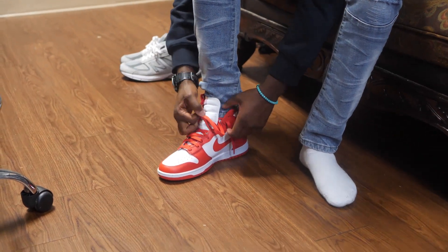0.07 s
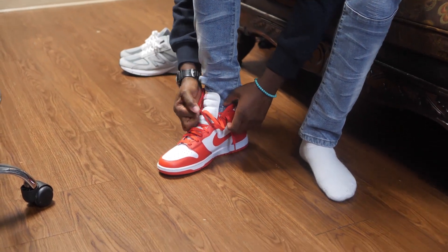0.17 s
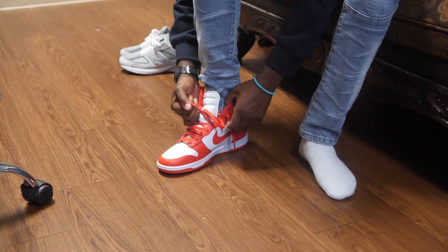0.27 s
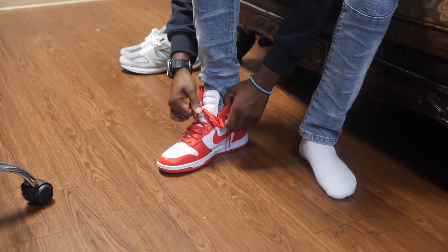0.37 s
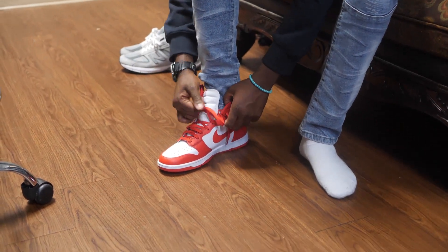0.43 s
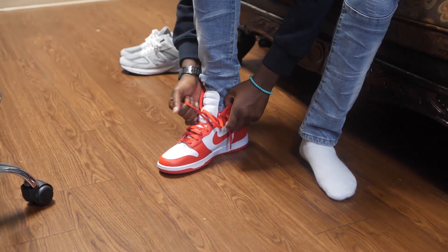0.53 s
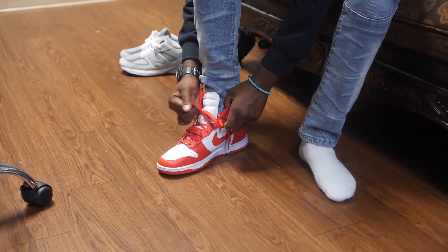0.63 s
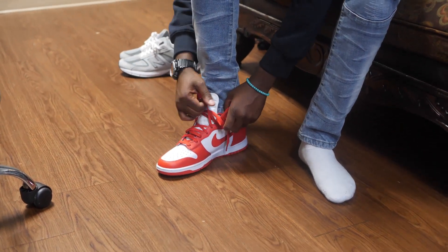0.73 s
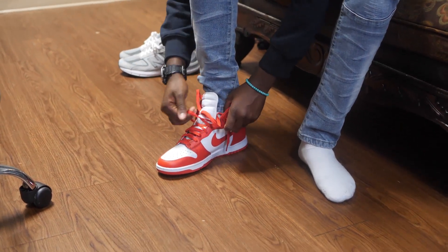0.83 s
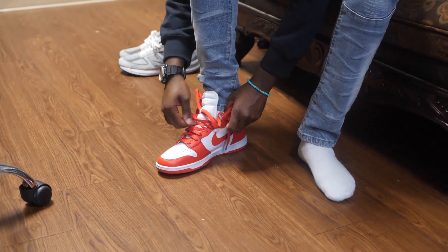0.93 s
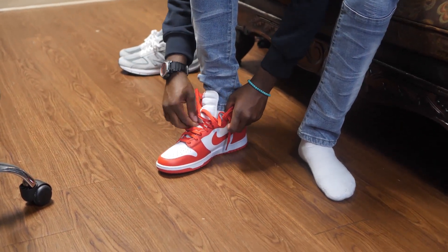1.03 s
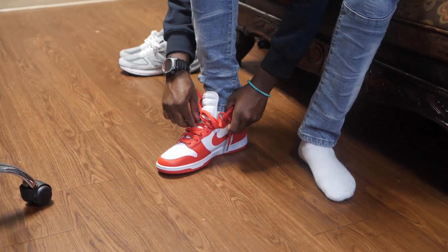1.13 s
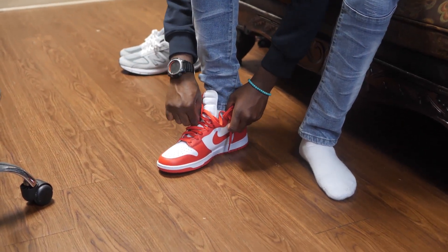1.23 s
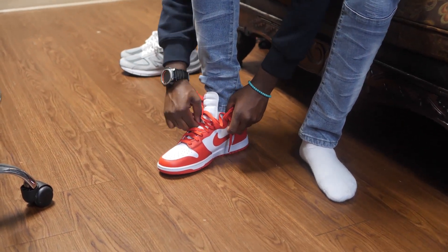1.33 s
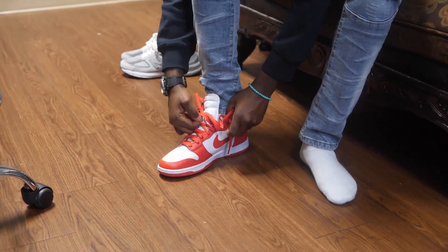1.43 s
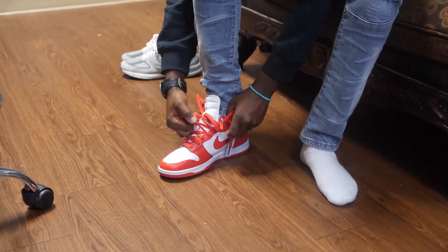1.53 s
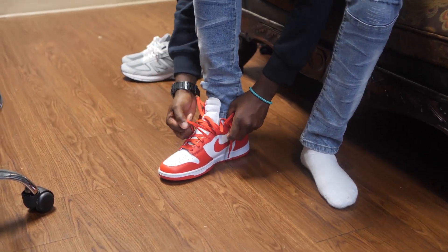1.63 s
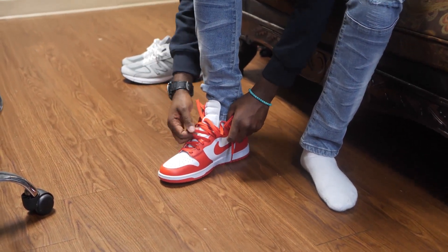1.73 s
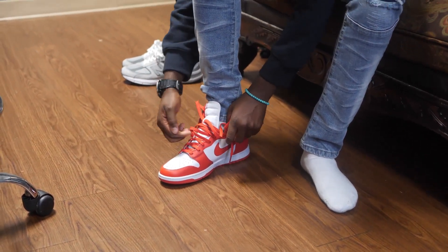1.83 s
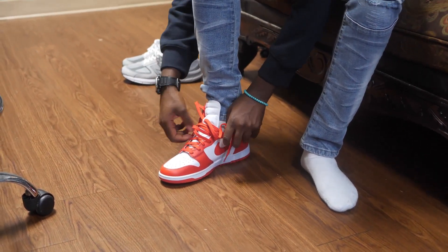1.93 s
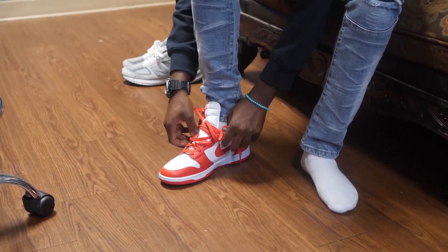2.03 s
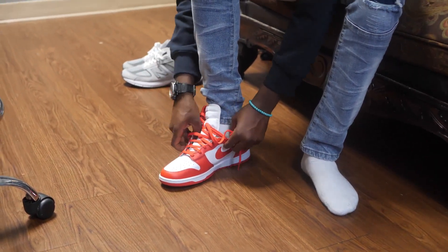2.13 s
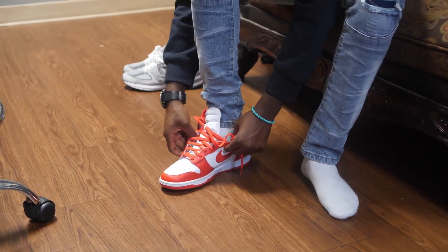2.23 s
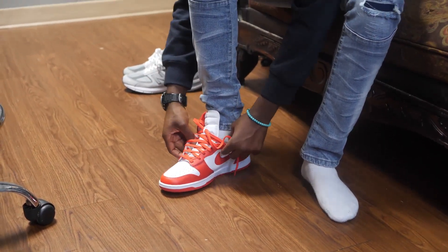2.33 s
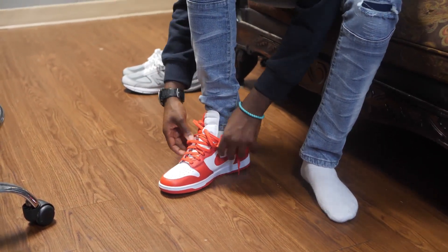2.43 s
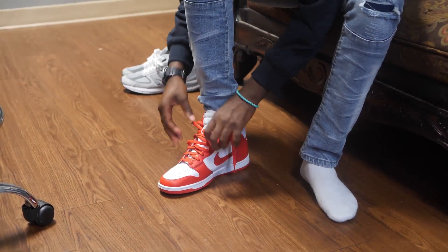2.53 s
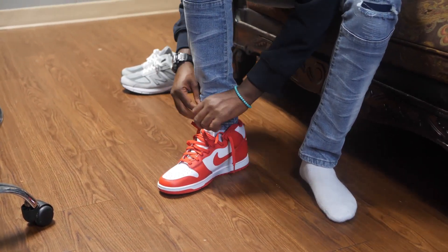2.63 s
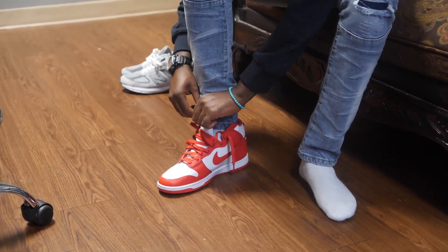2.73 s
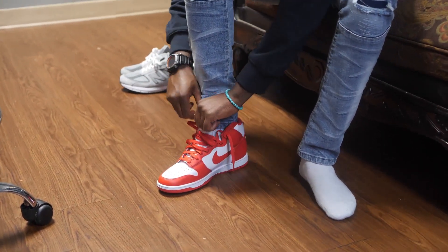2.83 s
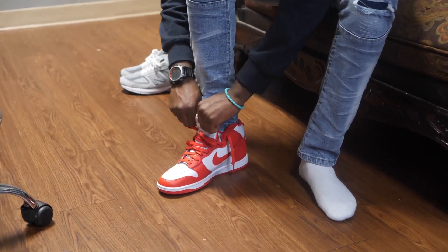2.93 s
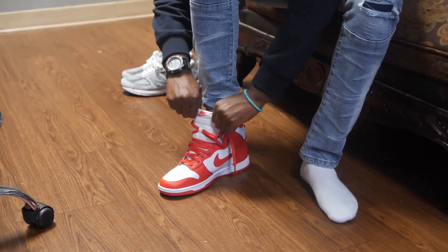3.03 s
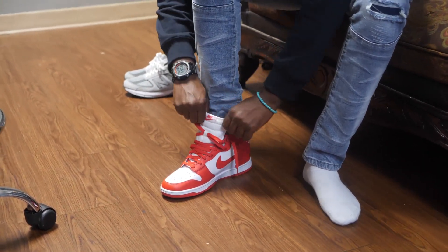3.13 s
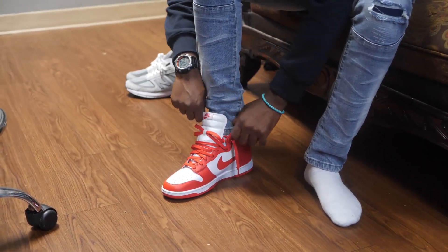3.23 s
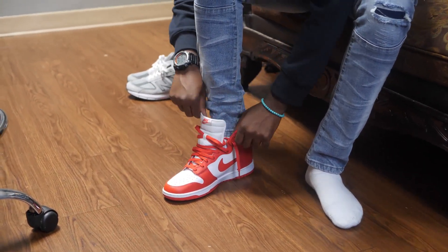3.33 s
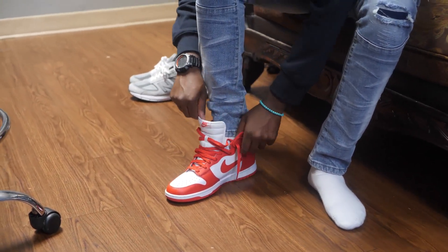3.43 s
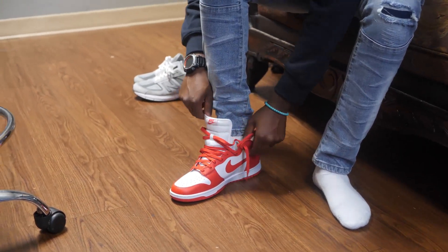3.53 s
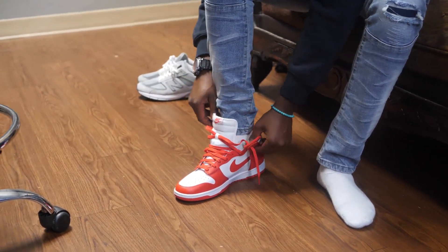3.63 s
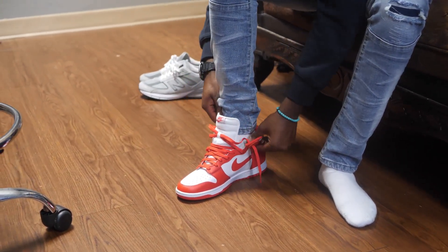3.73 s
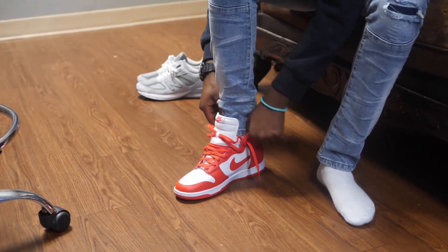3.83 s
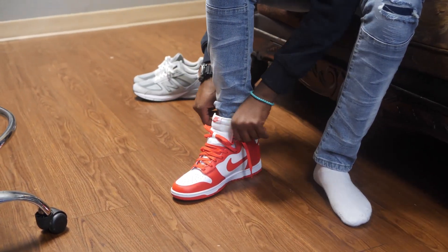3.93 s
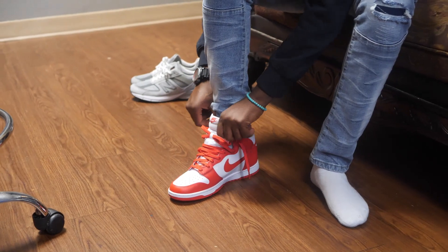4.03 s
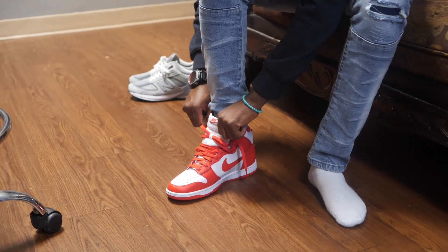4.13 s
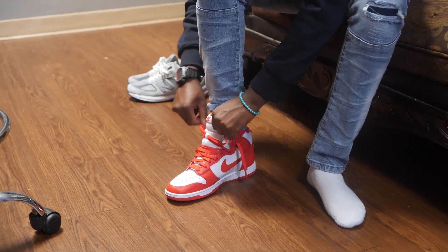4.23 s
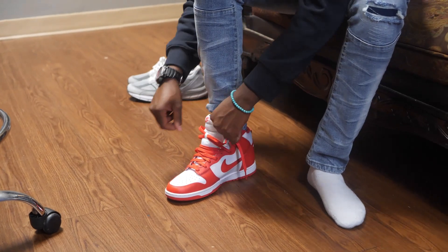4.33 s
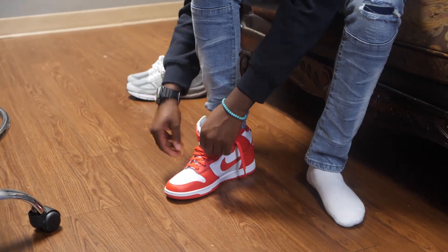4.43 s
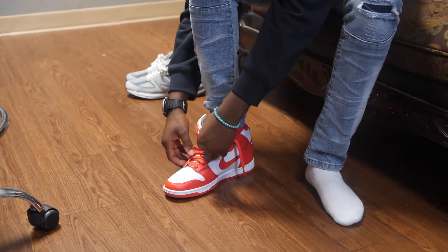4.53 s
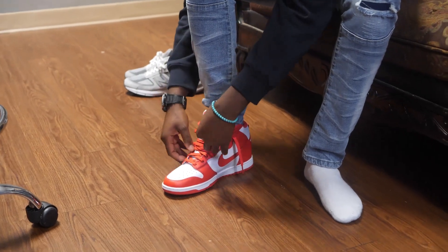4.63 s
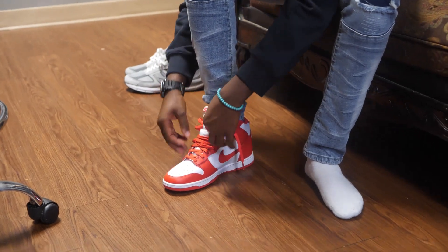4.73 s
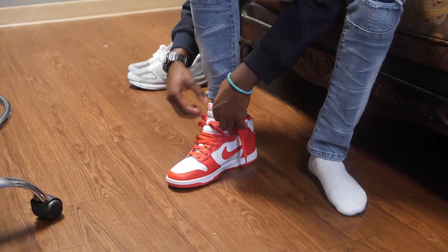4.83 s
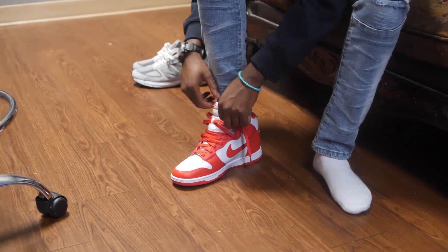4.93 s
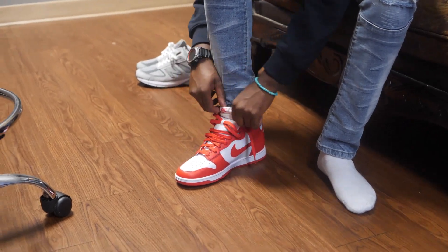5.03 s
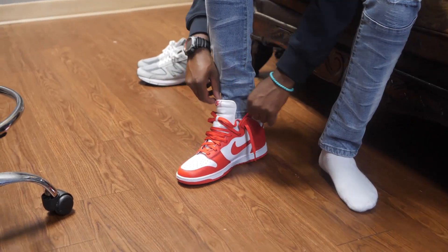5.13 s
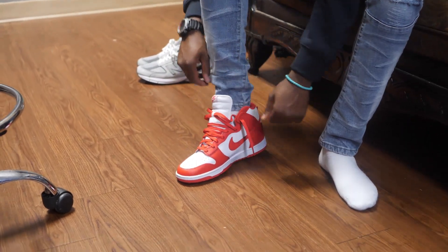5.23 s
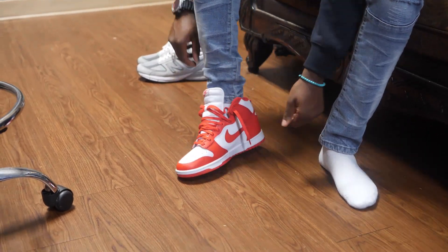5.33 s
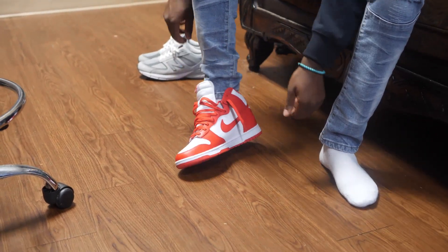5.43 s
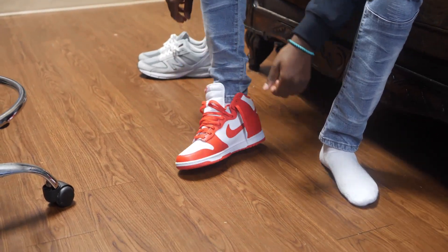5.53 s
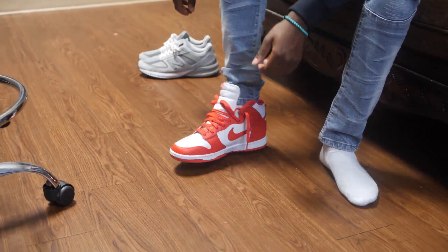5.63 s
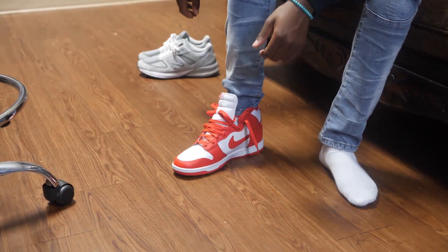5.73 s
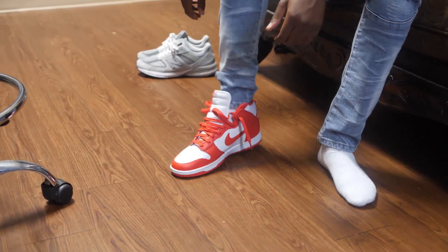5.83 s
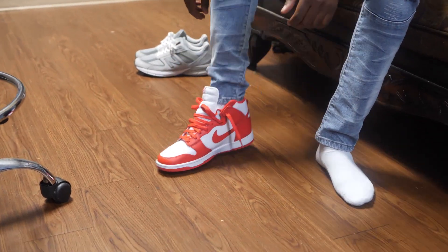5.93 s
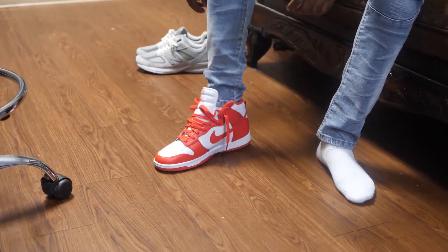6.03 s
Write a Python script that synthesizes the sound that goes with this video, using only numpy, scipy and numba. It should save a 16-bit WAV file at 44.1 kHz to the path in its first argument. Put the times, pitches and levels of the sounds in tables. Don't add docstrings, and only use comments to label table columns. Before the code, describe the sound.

In a small, quiet indoor room, close microphones catch laces sliding and tightening, leather creasing hollowly and denim and sleeves brushing. Light knocks and tiny clicks dot the rustling, which pauses and restarts with each hand movement. After a softer stretch, two abrupt, crunchy sole knocks hit the wooden floor, answered by a short room reflection over soft steady air noise.

```python
import sys
import numpy as np
from scipy import signal
from scipy.fft import rfft, irfft
from scipy.io import wavfile
from scipy.ndimage import uniform_filter1d
from numba import njit

SR = 44100
rng = np.random.default_rng(int(sys.argv[2]) if len(sys.argv) > 2 else 0)


def transcribe(signal):
    frames = np.atleast_2d(signal).T
    limited = np.clip(frames, -1, 1)
    pcm = np.round(limited * 32767).astype(np.int16)
    wavfile.write(sys.argv[1], SR, pcm)


def convert_level_to_amplitude(level_db):
    exponent = np.asarray(level_db, float) / 20
    return 10 ** exponent


N = 268128

# pitch_hz, side_minus_mid_db
WIDTH = [(60, -45), (110, -69), (200, -40), (380, -18), (700, -11.5), (1290, -4), (2380, -6), (4400, -6.5),
         (8120, -13.5), (15000, -5)]


def rms_one(x):
    return x / np.sqrt(np.mean(x ** 2) + 1e-20)


def add(out, s, shape):
    start = int(s * SR)
    out[start:start + len(shape)] += shape[:N - start]


def in_time(rows):
    s, *columns = np.transpose(rows)
    return [np.interp(np.arange(N) / SR, s, c) for c in columns]


def at_hz(points, hz):
    table_hz, values = np.array(points)[:, 0], np.array(points)[:, 1]
    return np.interp(np.log(np.maximum(hz, 1)), np.log(table_hz), values)


def colour(x, spectrum):
    gain = convert_level_to_amplitude(at_hz(spectrum, np.fft.rfftfreq(N, 1 / SR)))
    return irfft(rfft(x) * gain, N)


def band(x, low_hz, high_hz):
    return signal.sosfilt(signal.butter(2, [low_hz, high_hz], "band", fs=SR, output="sos"), x)


def drift(rate):
    r = np.exp(-2 * np.pi * rate / SR)
    wander = signal.lfilter([1], [1, -2 * r, r * r], rng.standard_normal(N + 9000))
    return rms_one(wander[9000:])


def slips(per_s, spread_db, clump_db):
    heights = convert_level_to_amplitude(spread_db * np.minimum(rng.exponential(1, N), 5))
    sizes = heights * rng.choice([-1, 1], N)
    happens = rng.random(N) < per_s / SR
    return rms_one(sizes * happens * convert_level_to_amplitude(clump_db * drift(49)))


def ring(clicks, hz, t60):
    r, w = convert_level_to_amplitude(-60 / (t60 * SR)), 2 * np.pi * hz / SR
    return signal.lfilter([0, np.sin(w)], [1, -2 * r * np.cos(w), r * r], clicks + 1e-18)


@njit
def moving_resonance(x, cosine, r):
    y = np.zeros(len(x))
    for i in range(2, len(x)):
        y[i] = x[i] - x[i - 2] + 2 * r * cosine[i] * y[i - 1] - r * r * y[i - 2]
    return y


def knock(hz, db, cycles, soft, edge=2.2):
    turns = np.arange(int(2 * cycles * SR / hz)) * hz / SR
    swell = 1 - np.exp(-(turns / max(soft, .05)) ** 2)
    shape = -np.sin(2 * np.pi * turns) * swell * convert_level_to_amplitude(-60 * turns / cycles)
    shape = signal.sosfilt(signal.butter(4, edge * hz, fs=SR, output="sos"), shape)
    return convert_level_to_amplitude(db) * shape / np.abs(shape).max()


def tick(db, decay_s):
    return convert_level_to_amplitude(db) * np.exp(-np.arange(int(8 * decay_s * SR)) / SR / decay_s)


def strokes(rows):
    roundness = 1.17
    t = np.arange(0, N + 64, 64) / SR
    power = 1e-12
    for s, db, rise_s, fall_s in rows:
        before = (s - t) / max(rise_s, 1e-3)
        after = (t - s) / max(fall_s, 1e-3)
        away = np.where(t < s, before, after)
        power = power + convert_level_to_amplitude(db - 10 * away ** roundness) ** 2
    return np.interp(np.arange(N) / SR, t, 10 * np.log10(power))


def body(rub, modes, spectrum, tone):
    rings = 0
    for k, (hz, width, db) in enumerate(modes):
        rings = rings + (-1) ** k * convert_level_to_amplitude(db) * rms_one(ring(rub, hz, 2.2 / width))
    scrape = rms_one(colour(rub[::-1], spectrum))
    return (tone * rms_one(colour(rings, spectrum)) + scrape) / np.sqrt(1 + tone ** 2)


def room_tone():
    # pitch_hz, level_db (per Hz)
    air_colour = [(40, -26), (88, -17), (126, -3), (197, -5), (296, -3), (352, -5), (684, -4), (1100, -8),
                  (1680, -9), (3420, -17), (6640, -19), (10600, -13), (14700, -19), (16000, -31)]
    # time_s, level_db
    traffic = [(0.0, -90), (2.0, -84), (4.6, -80), (4.9, -72), (5.65, -72)]
    # low_hz, high_hz, level_db
    duct = [(104, 124, -69), (295, 307, -75)]
    mid, side = colour(rng.standard_normal((2, N)), air_colour)
    mid_air = mid * convert_level_to_amplitude(0.9 * drift(26))
    air = convert_level_to_amplitude(-58.5) / np.std(mid) * np.array([mid_air, colour(side, WIDTH)])
    rumble = band(band(rng.standard_normal(N), 61, 76), 61, 76)
    air[0] += convert_level_to_amplitude(in_time(traffic)[0]) * rms_one(rumble)
    for low_hz, high_hz, db in duct:
        air[0] += convert_level_to_amplitude(db) * rms_one(band(rng.standard_normal(N), low_hz, high_hz))
    return air


def room(x):
    # pitch_hz, t60_s
    room_t60 = [(100, 0.56), (300, 0.22), (800, 0.18), (2000, 0.19), (5000, 0.21), (12000, 0.3)]
    # pitch_hz, level_db
    room_colour = [(85, -36), (130, -4), (200, 1), (350, -6), (700, -1.5), (1300, -3.5), (2500, -4.5),
                   (4500, -1), (7000, -3), (11000, -19)]
    # pitch_hz, side_minus_mid_db
    room_width = [(60, -21), (110, -30), (200, -36), (380, -26), (700, -18), (1290, -10), (2380, -11),
                  (4400, -10), (8120, -15), (15000, -8)]
    t = np.arange(int(.5 * SR)) / SR
    white = rng.standard_normal((2, 2, len(t)))
    edges = 70 * 2 ** np.arange(0, 8.1, .5)
    tail = 0
    for k, (low, high) in enumerate(zip(edges, edges[1:])):
        hz = np.sqrt(low * high)
        decay = convert_level_to_amplitude(at_hz(room_colour, hz) - 60 * t / at_hz(room_t60, hz))
        spread = convert_level_to_amplitude([[0], [at_hz(room_width, hz) + 3.2]])
        tail = tail + band(white[k % 2], low, high) * decay * spread
    tail = convert_level_to_amplitude(-28.0) * tail * (1 - np.exp(-(t / 0.0022) ** 2))
    tail[0, int(.012 * SR)] += convert_level_to_amplitude(-20)
    return signal.fftconvolve(x[None], tail, axes=1)[:, :N]


def cloth():
    # pitch_hz, level_db (per Hz)
    cloth_colour = [(2650, -2.5), (4500, -9), (7600, -12), (8900, 2), (9560, 3), (10700, 0.5),
                    (12800, -0.5), (14900, -11), (15600, -10)]
    # peak_s, level_db, rise_s, fall_s (times
    # for 10 dB)
    cloth_strokes = [(.016, -51, .05, .05), (.112, -45, .055, .08), (.252, -45, .036, .055), (.34, -55, .04, .14),
                     (.515, -51, .025, .06), (.58, -45, .05, .025), (.73, -56, .11, .2), (1.106, -50, .008, .03),
                     (1.215, -45, .045, .033), (1.31, -53, .012, .035), (1.41, -46.5, .035, .12),
                     (1.5, -48, .1, .05), (1.595, -50, .03, .06), (1.67, -42, .003, .018),
                     (2.05, -51, .065, .025), (2.17, -44, .055, .06), (2.3, -55, .08, .035),
                     (2.47, -53.5, .055, .035),
                     (2.66, -58, .06, .15), (2.81, -54, .1, .05), (2.93, -49.5, .06, .07),
             (3.062, -40.5, .035, .03), (3.14, -50.5, .04, .1), (3.27, -48, .08, .1), (3.44, -53, .07, .13),
             (3.61, -51.5, .12, .008), (3.715, -51, .03, .04), (3.84, -45.5, .03, .02),
             (3.88, -56, .03, .18), (4.14, -57, .3, .03), (4.24, -47, .03, .1), (4.335, -49, .015, .036),
             (4.42, -57, .06, .2), (4.55, -56, .1, .04), (4.65, -51, .03, .05), (4.785, -54, .008, .045),
             (4.94, -55, .025, .08), (5.03, -48.5, .07, .05), (5.11, -47, .012, .04), (5.185, -54, .05, .2),
             (5.52, -57.5, .12, .45), (5.724, -50, .003, .1), (5.905, -51, .035, .03),
             (6.009, -49, .003, .07)]
    fibres = band(slips(per_s=14000, spread_db=2.5, clump_db=2.3), 2500, 18000)
    return convert_level_to_amplitude(strokes(cloth_strokes)) * rms_one(colour(fibres, cloth_colour))


def crunch():
    # peak_s, level_db, fall_s (for 10 dB), low_hz, high_hz
    bursts = [
        (5.724, -46, .03, 1000, 2800),
        (5.772, -37, .045, 2000, 4800),
        (5.8, -40, .03, 2100, 2900),
        (5.957, -48, .05, 1200, 2600),
        (5.953, -57, .06, 2800, 5000),
        (6.02, -44, .05, 1500, 3800),
        (5.7, -64, .9, 3000, 8000),
    ]
    grains = slips(per_s=5000, spread_db=2.0, clump_db=2.5)
    out = np.zeros(N)
    for s, db, fall_s, low_hz, high_hz in bursts:
        rise_s = .004 + .3 * (db < -60)
        burst = rms_one(band(band(grains, low_hz, high_hz), low_hz, high_hz))
        out += convert_level_to_amplitude(strokes([(s, db, rise_s, fall_s)])) * burst
    return out


def stamps():
    # pitch_hz, level_db, t60_s
    board_modes = [(124, -30, 0.1), (177, -19, 0.074), (209, -7, 0.11), (427, -18, 0.09), (815, -10, 0.2)]
    # start_s, pitch_hz, level_db, cycles to die, share of a cycle to swell
    thud_events = [(5.7211, 260, -10, 6, .08), (5.7215, 560, -18, 4, .08), (5.7331, 400, -16, 6, .3),
                   (5.802, 750, -24, 14, .8), (5.7425, 380, -26, 7, .3), (5.7533, 380, -12, 6, .1),
                   (5.7627, 660, -5, 3.5, .05), (5.7642, 700, -16, 6, .3), (5.7744, 880, -14, 4, .08),
                   (5.7775, 850, -16, 10, .5), (5.7845, 400, -19, 6, .3), (5.9525, 410, -27, 8, .3),
                   (5.9605, 400, -31, 9, .4), (6.0066, 500, -10, 6, .08), (6.0174, 800, -13, 2.5, .05),
                   (6.0105, 330, -17, 6, .2), (6.0236, 600, -16, 7, .2), (6.0293, 680, -10, 7, .1),
                   (6.0225, 290, -22, 7, .3), (6.0215, 160, -29, 7, .3), (6.033, 620, -20, 8, .4),
                   (6.063, 1000, -26, 12, .6), (6.0385, 480, -19, 10, .5), (6.0465, 760, -17, 12, .8),
                   (6.0545, 600, -19, 8, .4)]
    # start_s, pitch_hz, level_db, cycles to die, share of a cycle to swell
    slap_events = [(5.7216, 1900, -17, 10, 0.22), (5.7218, 1140, -23, 6, 0.4), (5.7533, 1840, -16, 18, 1.0),
                   (5.7627, 2450, -2.5, 10, .05), (5.7746, 2400, -8, 4, .05), (5.7658, 2480, -13.5, 29, .2),
                   (5.7627, 4200, -15.5, 9.7, 0.22), (5.7660, 4000, -18, 13, 0.3),
                   (5.7780, 3400, -17, 12, 0.36), (5.7785, 5130, -29, 7.4, .3),
                   (5.7835, 2570, -22, 30, 1.2), (5.804, 2600, -24, 20, 1.0), (5.811, 2300, -25, 20, 1.0),
                   (5.7918, 2300, -15, 18, 0.9), (5.7930, 4200, -23, 10, 0.35), (5.8010, 3570, -27, 12, .5),
                   (5.8060, 4460, -30, 9.3, .4), (5.813, 2980, -27, 12, .5), (5.831, 2600, -36, 10, 0.45),
                   (5.9511, 1740, -18.5, 17, 1.1), (5.9518, 2150, -27, 12, 0.9),
                   (5.951, 1240, -25, 13, 0.55), (6.0067, 1950, -17, 20, .3), (6.0173, 1250, -1, 2.4, .05),
                   (6.0184, 1500, -12, 8, .3), (6.0072, 3250, -22.5, 16, 0.63), (6.0068, 4630, -22, 12, .3),
                   (6.0088, 2610, -15.5, 9.2, 0.24), (6.0200, 3000, -19.5, 8, .3),
                   (6.0258, 1040, -19, 10, 0.44)]
    # start_s, level_db
    grit = [
        (1.667, -44),
        (1.68, -50),
        (5.7217, -41),
        (5.7333, -40),
        (5.754, -42),
        (5.7629, -29),
        (5.7747, -39),
        (5.9514, -51),
        (6.0068, -34),
        (6.0169, -39),
    ]
    thuds, slaps, edge = np.zeros(N), np.zeros(N), np.zeros(N)
    for s, *contact in thud_events:
        add(thuds, s, knock(*contact, edge=4.0))
    for s, *contact in slap_events:
        add(slaps, s, knock(*contact))
    for s, db in grit:
        add(edge, s, tick(db, decay_s=.0015))
    boards = sum(convert_level_to_amplitude(db - 56) * ring(thuds, hz, t60) for hz, db, t60 in board_modes)
    no_deep_bass = signal.butter(4, 130, "high", fs=SR, output="sos")
    wood = signal.sosfilt(no_deep_bass, thuds + slaps + boards)
    return wood + edge * rms_one(band(rng.standard_normal(N), 3000, 14000))


def taps():
    # start_s, level_db, hollow_hz, slap_db, tick_db (both from the peak)
    upper_taps = [(0.248, -32.5, 590, -1, -17), (0.501, -48, 977, -9, -23), (0.993, -39.5, 574, -10, -11),
                  (1.1, -47, 975, -6, -5), (2.205, -44, 180, -30, -30), (.56, -41, 190, -30, -30),
                  (1.666, -26, 523, -22, -12), (1.991, -45, 580, -8.5, -15), (2.288, -37, 525, -11, -28),
                  (3.192, -30, 710, -10, -18), (3.416, -35.5, 660, -17, -25), (3.87, -36, 840, -23, -14),
                  (4.209, -40, 820, -26.5, -42), (4.538, -37.5, 514, -7, -11), (4.552, -43, 490, 8, -18),
                  (4.621, -34, 880, -11, -31), (4.628, -34, 460, -6, -18),]
    # start_s, level_db, hollow_hz, slap_db, tick_db (both from the peak)
    heel_taps = [
        (4.84, -58, 463, 11, -20),
        (4.857, -51, 436, 9, -20),
        (4.889, -48, 584, 3, -24),
        (5.102, -42, 686, -11, -20),
        (5.163, -48, 466, 6, -34),
        (5.514, -39, 393, -14, -22),
    ]
    # start_s, pitch_hz, level_db
    eyelet_clicks = [(1.1005, 2600, -45), (1.2955, 1900, -37), (1.297, 4300, -48), (1.21, 3200, -46),
                     (4.8895, 1750, -40), (4.539, 4200, -48), (4.629, 4300, -50), (4.627, 3300, -51),
                     (4.778, 2100, -50), (4.787, 2030, -53), (4.794, 1900, -59), (4.95, 1770, -51),
                     (5.016, 676, -48), (5.034, 1600, -43), (5.1038, 1750, -42), (5.108, 2150, -36),
                     (5.11, 3050, -46), (5.121, 1790, -41)]
    out, edge = np.zeros(N), np.zeros(N)
    for rows, slap_hz in (upper_taps, 1400), (heel_taps, 1900):
        for s, db, low_hz, slap_db, tick_db in rows:
            add(out, s, knock(low_hz, db - 2, cycles=7.0, soft=.2))
            add(out, s, knock(slap_hz, db + slap_db - 2, cycles=10.0, soft=.25))
            add(edge, s, tick(db + tick_db - 1.5, decay_s=.0025))
    for s, hz, db in eyelet_clicks:
        add(out, s, knock(hz, db, cycles=26.0, soft=.8))
    out = signal.sosfilt(signal.butter(1, 120, "high", fs=SR, output="sos"), out)
    return out + edge * rms_one(band(rng.standard_normal(N), 1800, 6500))


def shoe():
    # pitch_hz, level_db (per Hz)
    leather_colour = [(150, -66), (700, -3), (1200, 3.5), (1800, 9.5), (2300, 5.5), (3200, -24.5)]
    # pitch_hz, width_hz, level_db
    panels = [(1315, 80, -3), (1680, 220, -0.5), (1886, 240, -4)]
    # pitch_hz, level_db (per Hz)
    lace_colour = [(300, -56), (1600, -48), (2400, -1), (4400, -8.5), (5200, -11.5), (6500, -12.5),
                   (8000, -16)]
    # pitch_hz, width_hz, level_db
    eyelets = [(2600, 130, -4), (3150, 90, -1), (3750, 100, -2), (4300, 110, -3)]
    # peak_s, leather_db, rise_s, fall_s, hollow_db (above leather)
    pulls = [(.016, -59, .04, .04, -2), (.113, -53, .038, .062, 7), (.251, -54, .034, .055, 5.5),
             (.345, -64, .04, .08, 5), (.508, -60, .02, .1, 9), (.57, -50.5, .06, .04, 4),
             (.74, -60, .09, .1, 1.5), (.9, -74, .1, .08, 13), (1.0, -64, .008, .035, 9),
             (1.103, -57, .003, .045, 5), (1.226, -46, .04, .03, 5), (1.302, -50, .007, .07, 2),
             (1.4, -55, .05, .1, 1), (1.51, -52, .1, .06, 2), (1.61, -59, .04, .07, 10),
             (1.669, -50, .002, .02, 15), (2.01, -65, .02, .1, 7), (2.07, -60, .05, .1, 7),
             (2.172, -54, .09, .07, 9), (2.33, -61, .12, .02, 4), (2.482, -55, .05, .03, 0.1)]
    # peak_s, leather_db, rise_s, fall_s, hollow_db (above leather)
    tugs = [(2.63, -61, .025, .1, -8), (4.565, -56, .02, .04, 0), (4.665, -56, .03, .04, 0),
            (2.68, -57, 0.05, 0.6, -6.5), (2.81, -55, .07, .09, 1.5), (2.93, -51, 0.07, 0.1, -3),
            (3.068, -44, .045, .028, -1.5), (3.23, -55.5, .15, 0.1, 2), (3.45, -57.5, .1, .15, -6),
            (3.59, -59.5, .1, 0, 6), (3.69, -57, 0.17, 0, 0), (3.82, -57.5, .09, .09, -3),
            (3.98, -61, -0.1, 0.26, -12), (4.14, -59.5, 0.2, .04, 3), (4.23, -60, .015, 0.1, 7.5),
            (4.33, -58.5, 0.2, -0.07, -8), (4.49, -57, -0.02, 0.07, -4), (4.541, -53.5, -0.01, 0.03, 9.5),
            (4.629, -51, 0.04, 0.04, 0), (4.782, -58.5, .012, .018, -14), (5.01, -51, .11, .075, -1.5),
            (5.109, -50, -0.01, 0.1, -3), (5.31, -54.5, 0.09, 0.2, -1.5), (5.55, -57, .12, .2, -2),]
    # peak_s, level_db, rise_s, fall_s, hollow_hz
    singing = [(.116, -52, .028, .04, 450), (.57, -56, .06, .04, 665), (1.385, -44, .018, .07, 565),
               (1.435, -48, .05, .04, 590), (1.53, -50, .05, .05, 520), (1.669, -44, .002, .016, 785),
               (3.2, -53, .05, .1, 705), (3.42, -50, .008, .03, 615), (3.59, -60, .04, .03, 600),
               (4.23, -51, .012, .055, 675), (4.629, -47, .008, .043, 582), (5.103, -55, .015, .15, 740),
               (5.551, -57, .15, .045, 496)]
    # peak_s, level_db, rise_s, fall_s
    shuffles = [(.112, -50, .04, .04), (.246, -61, .03, .06), (.565, -51, .025, .04), (.76, -63, .2, .08),
                (1.495, -54, .1, .11), (1.671, -36, .003, .024), (2.01, -59, .06, .2),
                (2.19, -50, .18, .05), (2.49, -60.5, .06, .07), (2.66, -59, .15, .4), (3.07, -56, .045, .2),
                (3.24, -56, .15, .25), (3.59, -56, .08, .065), (3.69, -56.5, .03, .15),
                (4.33, -59, .2, .06), (4.541, -52, .007, .13), (4.8, -56.5, .15, .2),
                (4.975, -56, .07, .13), (5.103, -57, .015, .3), (5.551, -57, .18, .2)]
    # peak_s, level_db, rise_s, fall_s
    free_lace = [
        (1.175, -50.5, 0, 0.23),
    ]
    # peak_s, level_db, rise_s, fall_s
    whistles = [
        (1.47, -58, .06, .07),
        (1.6, -62, .03, .05),
    ]

    moves = [*pulls, *tugs]
    threading = np.arange(N) < 2.56 * SR
    leather_db = strokes([row[:4] for row in moves])
    hollow_db = strokes([(s, db + above_db, rise_s, fall_s) for s, db, rise_s, fall_s, above_db in moves])
    lace_db = leather_db + np.where(threading, -1.6, -4.5)
    lace_gain = np.hypot(convert_level_to_amplitude(lace_db), convert_level_to_amplitude(strokes(free_lace)))
    hum_gain = np.hypot(convert_level_to_amplitude(hollow_db - 13), convert_level_to_amplitude(strokes([row[:4] for row in singing])))

    drag = slips(per_s=1100, spread_db=2.5, clump_db=3.0)
    drag = rms_one(band(band(drag, 125, 400), 125, 400))

    rub = slips(per_s=1700, spread_db=1.0, clump_db=-1.5)
    hollow_hz, = in_time([(row[0], row[4]) for row in singing])
    flex = rms_one(uniform_filter1d(rub, size=1500))
    hollow_hz = hollow_hz * (1 + .06 * flex)
    cosine = np.cos(2 * np.pi * hollow_hz / SR)
    hum = rub
    for width_hz in 150, 250:
        hum = moving_resonance(hum, cosine, np.exp(-np.pi * width_hz / SR))
    hollow = hum_gain * rms_one(hum) + convert_level_to_amplitude(hollow_db + 0.55) * rms_one(band(rub, 420, 1200))

    fine = slips(per_s=3000, spread_db=2.5, clump_db=2.0)
    leather = body(fine, panels, leather_colour, tone=1.0)
    lace = body(fine, eyelets, lace_colour, tone=.25 + .55 * threading)
    twang = convert_level_to_amplitude(strokes(whistles)) * rms_one(ring(fine, hz=7550, t60=.008))
    return convert_level_to_amplitude(strokes(shuffles)) * drag + hollow + convert_level_to_amplitude(leather_db) * leather + lace_gain * lace + twang


def scene():
    leather, fabric = shoe(), cloth()
    blows = taps() + stamps()
    mid, side = room(blows + convert_level_to_amplitude(-4) * leather + convert_level_to_amplitude(-18) * fabric) + room_tone()
    mid = mid + convert_level_to_amplitude(-1.5) * leather + convert_level_to_amplitude(-2.5) * fabric + blows + crunch()
    late = np.roll(leather + fabric, 150)
    side = side + convert_level_to_amplitude(-8.0) * colour(late, WIDTH)
    return np.array([mid + side, mid - side])


def low_pass(x):
    return signal.sosfilt(signal.butter(12, 15800, fs=SR, output="sos"), x)


def record(dry):
    x = signal.sosfilt(signal.butter(2, 40, "high", fs=SR, output="sos"), dry)
    x = signal.sosfilt(signal.ellip(10, .5, 70, 15550, fs=SR, output="sos"), x)
    return low_pass(x)


dry = scene()
out = record(dry)
transcribe(out)
```